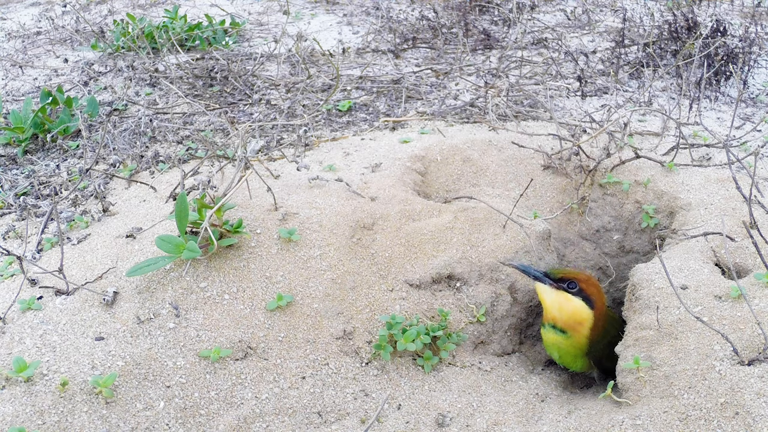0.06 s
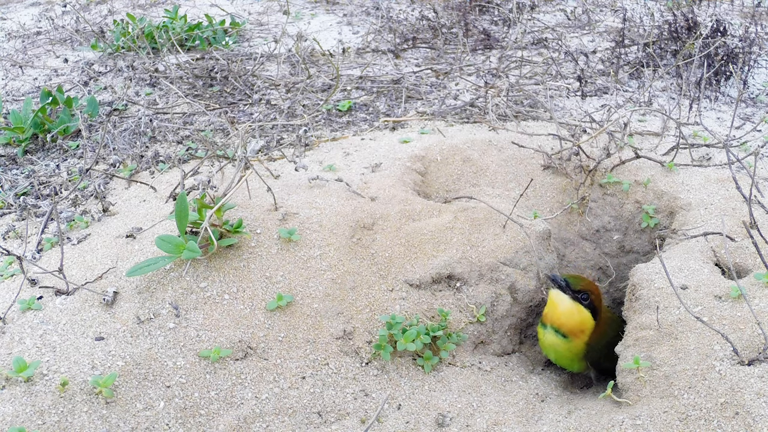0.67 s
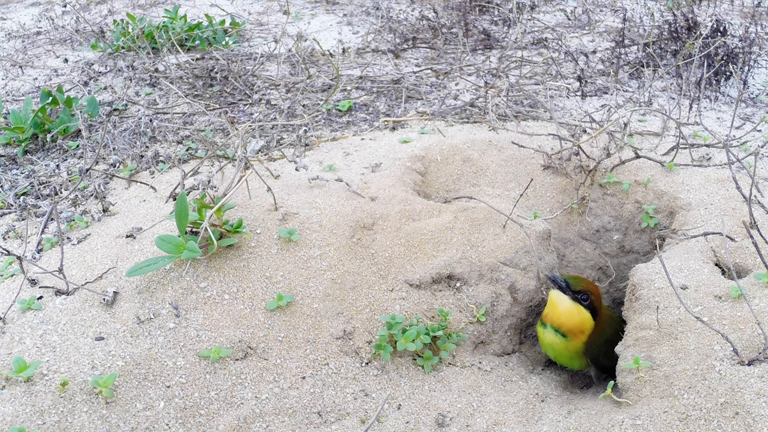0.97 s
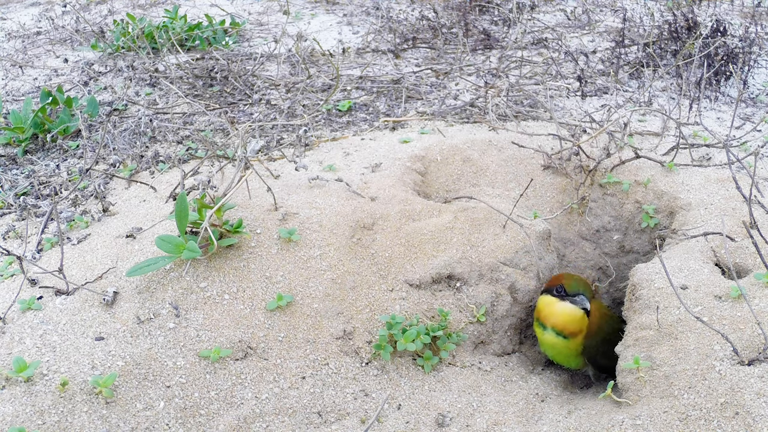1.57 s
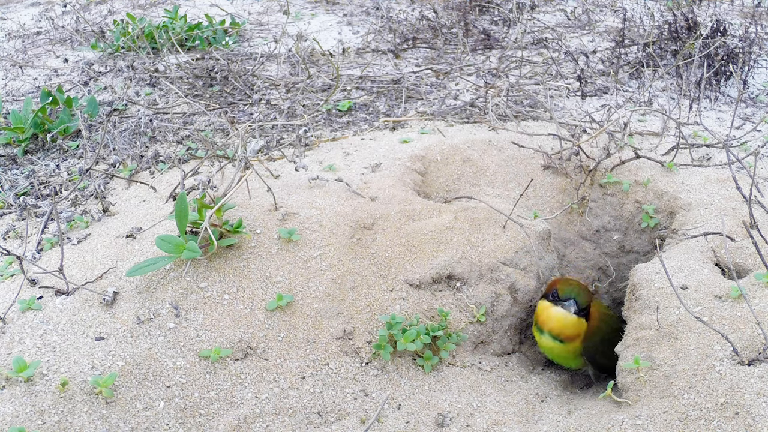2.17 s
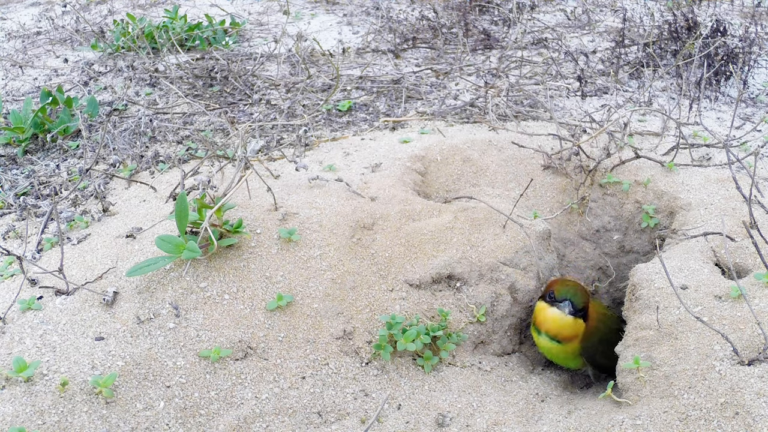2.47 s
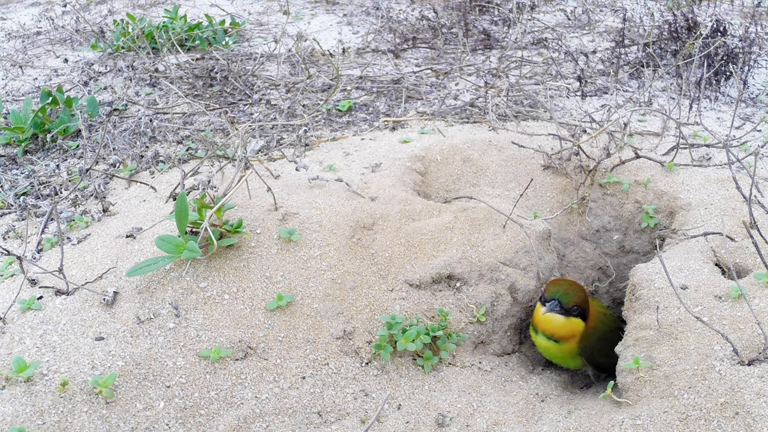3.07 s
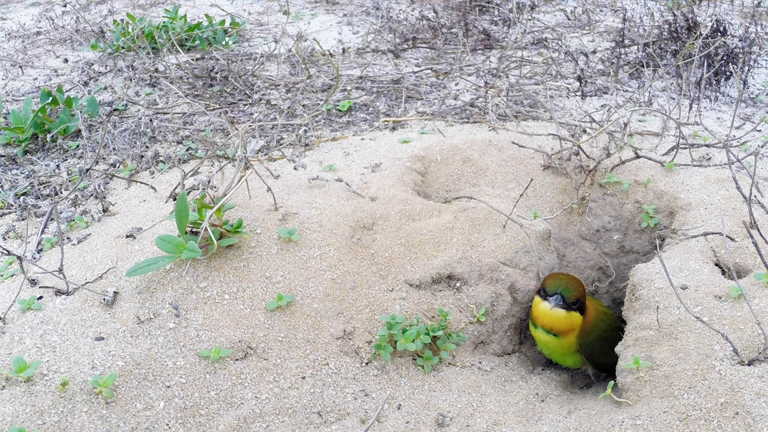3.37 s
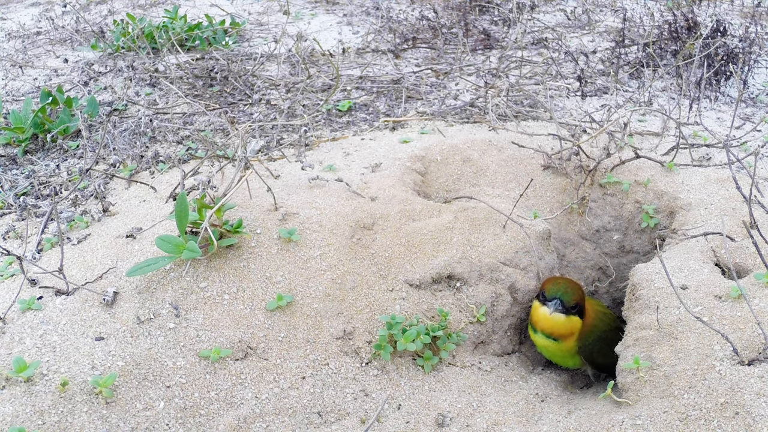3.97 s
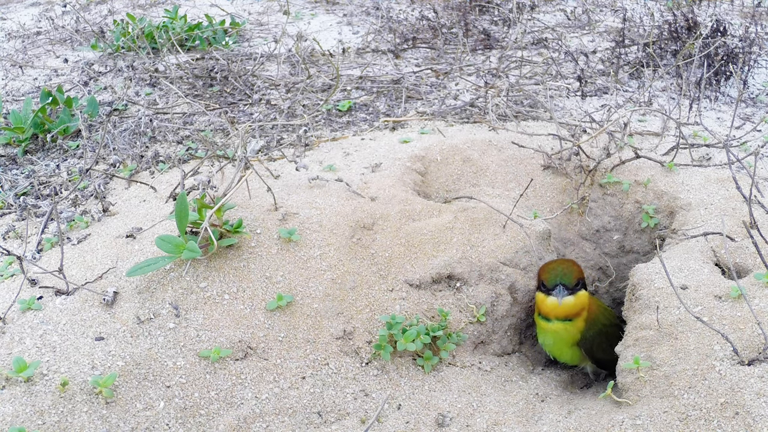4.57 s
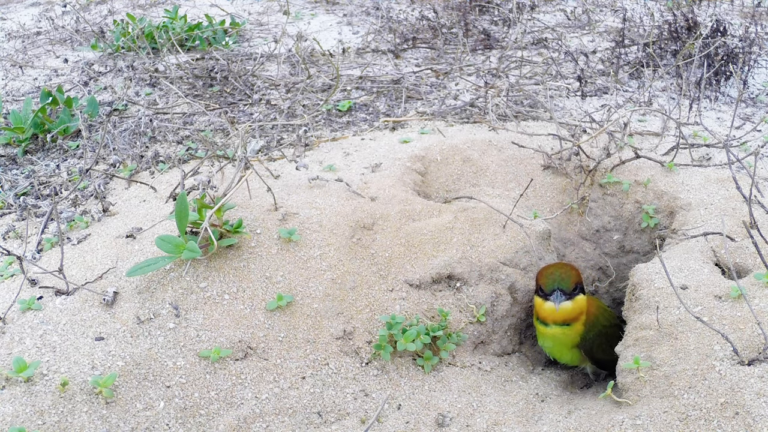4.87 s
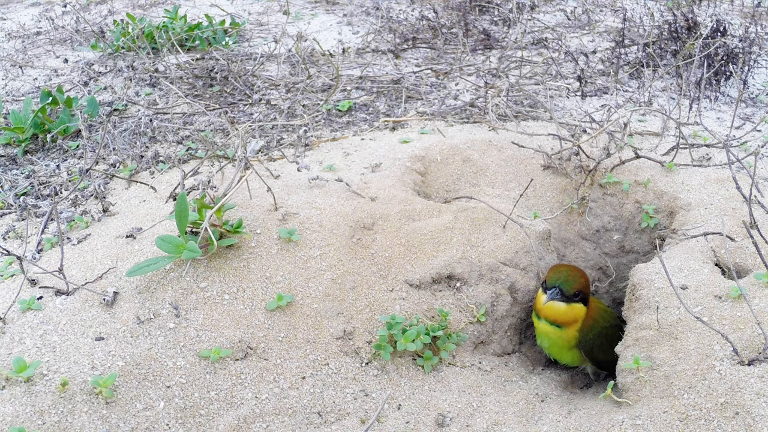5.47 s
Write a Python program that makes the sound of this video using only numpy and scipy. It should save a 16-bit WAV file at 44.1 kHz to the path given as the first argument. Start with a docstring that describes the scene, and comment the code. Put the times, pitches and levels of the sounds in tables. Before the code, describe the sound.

From the start, distant wind makes a quiet, low, steady rush over open sandy scrub, swelling only slightly. Behind it a cricket pulses a very faint, thin, high tone, fast and even. Another insect rasps its wings in barely audible high phrases at the very start, from about 1.7 to 2.6 seconds and from 3.4 to 4.1 seconds. A far bird gives two faint, very quick rising chirps at about 0.8 and 1.2 seconds. Tiny insect scrapes, just as faint as the cricket, dot the background near 1, 3, 4 and 5 seconds. The mood stays calm and the level low until about 5.65 seconds, when everything abruptly drops out. An instant later, at about 5.7 seconds, comes one short, sharp electrical pop, by far the loudest sound.

```python
"""Calm sandy scrub with insects.

Distant wind rushes low and steady. One insect rasps its wings in short phrases; a bush cricket
pulses a thin tone, one pulse per wing closing. A far bird whistles two chirps, and brief insect
scrapes dot the scrub. At the very end the sound drops out and a voltage step makes a sharp pop."""
import sys
import numpy as np
from scipy import signal
from scipy.fft import rfft, irfft
from scipy.io import wavfile
from scipy.ndimage import uniform_filter1d

SR = 44100
rng = np.random.default_rng(int(sys.argv[2]) if len(sys.argv) > 2 else 0)


def bounce(signal):
    """Save signal as a 16-bit WAV file at the path given by the first command-line argument."""
    frames = np.transpose(np.atleast_2d(signal))
    limited = np.clip(frames, -1, 1)
    pcm = np.round(limited * 32767).astype(np.int16)
    wavfile.write(sys.argv[1], SR, pcm)


N = 252693

# Wind spectrum. Each row: frequency in Hz, relative density in dB.
WIND_SPECTRUM = [(8, -30), (14, -9.5), (30, 0.5), (62, 1), (120, -1), (200, -4), (400, -9), (900, -15),
                 (2000, -21.5), (3200, -25.5), (6000, -32.5), (10000, -41), (12500, -42.5), (15000, -49)]
# Buzzing phrases. Each row: start in seconds, end in seconds, level in dB, note centre in seconds.
BUZZ_PHRASES = [(0.0, .31, -84, .08), (1.7, 2.56, -84, 2.3), (3.39, 4.07, -82, 3.84)]
# Buzzing insect's wing resonances. Each row: centre in Hz, width in Hz, relative level in dB.
WING_RESONANCES = [(9450, 700, -3), (10600, 200, -6), (10950, 300, -8), (12000, 2400, -3)]
# Bird whistles. Each row: start in seconds, length in seconds, start and end pitch in Hz, level in dB.
BIRD_GLIDES = [(0.812, .025, 2380, 3120, -61.5), (0.835, .012, 2480, 2360, -65),
               (1.223, 0.016, 2480, 3000, -65)]
# Near insect scrapes. Each row: centre in seconds, level in dB.
NEAR_SCRAPES = [(1.09, -78.5), (3.06, -79), (3.9, -81), (4.97, -79)]


def gain_of(db):
    """Decibels to amplitude."""
    return 10 ** (np.asarray(db) / 20)


def unit_rms(x):
    """Scales to an rms of one."""
    return x / np.sqrt(np.mean(x ** 2) + 1e-20)


def add(mix, start_s, sound):
    """Mixes a sound in at start_s."""
    part = mix[max(round(start_s * SR), 0):][:len(sound)]
    part += sound[:len(part)]


def band_noise(centre_hz, width_hz):
    """Unit-rms noise in a bell-shaped band."""
    hz = np.fft.rfftfreq(N, 1 / SR)
    bell = np.exp(-2 * ((hz - centre_hz) / width_hz) ** 2)
    return unit_rms(irfft(rfft(rng.standard_normal(N)) * bell, N))


def gate(start_s, end_s, taper=0.5):
    """Soft gate; each edge takes the share taper of its length."""
    progress = (np.arange(N) / SR - start_s) / (end_s - start_s)
    return np.sin(np.pi / 2 * np.clip(np.minimum(progress, 1 - progress) / taper, 0, 1))


def wind(level_db=-50.5, patchy_db=0.23, swell_db=0.6, rumble_hz=450):
    """Dark rush. Bands drift separately; the low end swells slightly with the breeze."""
    frames, hz = N // 512 + 6, np.fft.rfftfreq(2048, 1 / SR)
    real, imag, patches = rng.standard_normal((3, frames, len(hz)))
    patches = uniform_filter1d(patches, size=8, axis=0)
    patches = unit_rms(uniform_filter1d(patches, size=14, axis=1))
    breeze = unit_rms(uniform_filter1d(rng.standard_normal(frames), size=12))
    swell = breeze[:, None] / (1 + (hz / rumble_hz) ** 2)
    knot_hz, knot_db = np.transpose(WIND_SPECTRUM)
    steady_db = np.interp(np.log(hz + 1), np.log(knot_hz + 1), knot_db)
    spectra = (real + 1j * imag) * gain_of(steady_db + patchy_db * patches + swell_db * swell)
    rush = signal.istft(spectra.T, nperseg=2048, noverlap=1536)[1][:N]
    return gain_of(level_db) * unit_rms(rush)


def buzzing_insect(stroke_hz=147, depth=0.6, note_hz=10950, note_s=0.045, note_boost_db=4.5):
    """Fast rasping strokes drive wing resonances. One brief clear note rings in each phrase."""
    rasp = unit_rms(sum(gain_of(db) * band_noise(hz, width_hz) for hz, width_hz, db in WING_RESONANCES))
    strokes = 1 + depth * np.sin(2 * np.pi * stroke_hz * np.arange(N) / SR)
    phrases, notes = np.zeros((2, N))
    for start_s, end_s, db, centre_s in BUZZ_PHRASES:
        phrases += gain_of(db) * gate(start_s, end_s, taper=0.14)
        notes += gain_of(db + note_boost_db) * gate(centre_s - note_s / 2, centre_s + note_s / 2)
    return rasp * strokes * phrases + band_noise(note_hz, width_hz=150) * notes


def bush_cricket(level_db=-79, pitch_hz=11265, waver_hz=45, uneven_db=1.0, rasp_db=-9,
                 first_s=0.015, syllable_s=0.017, syllables_per_s=25):
    """Each wing closing rings a high, slightly unsteady tone inside the rasp of the file."""
    since_s = (np.arange(N) / SR - first_s) % (1 / syllables_per_s)
    stroke = np.sqrt(np.sin(np.pi * np.minimum(since_s / syllable_s, 1)).clip(0))
    cycles = np.cumsum(pitch_hz + waver_hz * band_noise(0, width_hz=202)) / SR
    tone = unit_rms(np.sin(2 * np.pi * cycles))
    rasp = gain_of(rasp_db) * band_noise(pitch_hz, width_hz=700)
    gain = gain_of(level_db + uneven_db * band_noise(0, width_hz=20))
    return gain * stroke * (tone + rasp)


def bird(scatter_db=-8, scatter_t60_s=0.22):
    """Quick gliding whistles, faintly scattered by the bushes."""
    calls = np.zeros(N)
    for start_s, length_s, start_hz, end_hz, db in BIRD_GLIDES:
        t = np.arange(0, length_s, 1 / SR)
        cycles = np.cumsum(start_hz + (end_hz - start_hz) * t / length_s) / SR
        whistle = np.sin(np.pi * t / length_s) * np.sin(2 * np.pi * cycles)
        add(calls, start_s, gain_of(db) * unit_rms(whistle))
    t = np.arange(SR // 2) / SR
    tail = rng.standard_normal(len(t)) * np.exp(-np.log(1000) * t / scatter_t60_s)
    scatter = signal.fftconvolve(calls, tail / np.linalg.norm(tail))[:N]
    return calls + gain_of(scatter_db) * scatter


def insect_scrapes(centre_hz=11750, width_hz=1900, length_s=0.045, far_per_s=1.2, far_db=-83):
    """Single scrapes in one band: a few near, fainter far ones at random."""
    far = [(i / SR, far_db) for i in np.flatnonzero(rng.random(N) < far_per_s / SR)]
    envelope = sum(gain_of(db) * gate(s - length_s / 2, s + length_s / 2) for s, db in NEAR_SCRAPES + far)
    return envelope * band_noise(centre_hz, width_hz)


def electrical_pop(start_s=5.7103, step_db=-13, settle_s=0.0072,
                   ring_hz=2750, ring_db=-16.5, ring_s=0.0037, cutoff_hz=3000, edge_db=-17):
    """A voltage step leaks away and rings. A narrow circuit dulls all but a trace of its edge."""
    t = np.arange(N) / SR - start_s
    on, t = t > 0, np.maximum(t, 0)
    step = on * gain_of(step_db) * np.exp(-t / settle_s)
    ring = on * gain_of(ring_db) * np.exp(-t / ring_s) * np.cos(2 * np.pi * ring_hz * t)
    dulled = signal.sosfilt(signal.butter(4, cutoff_hz, fs=SR, output="sos"), step - ring)
    return dulled + gain_of(edge_db) * (step - dulled)


def scene():
    """Wind, insects and bird, mono."""
    return (wind() + bush_cricket() + buzzing_insect() + insect_scrapes() + bird())[None]


def record(dry, dropout_s=5.655, cutoff_hz=15150):
    """Dropout, pop, then low-pass."""
    live = np.arange(N) / SR < dropout_s
    low_pass = signal.firwin(511, cutoff_hz, window=("kaiser", 9), fs=SR)
    return signal.oaconvolve(dry * live + electrical_pop(), low_pass[None], "same")


dry = scene()
out = record(dry)
bounce(out)
```